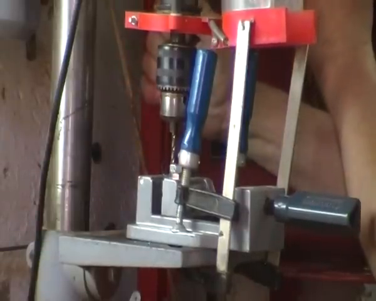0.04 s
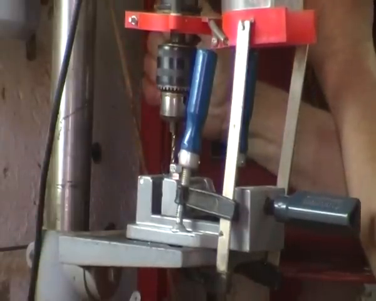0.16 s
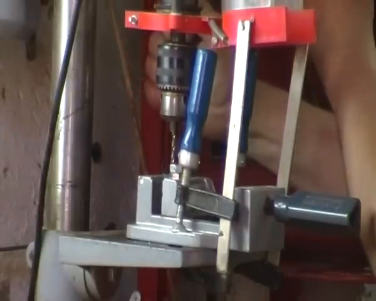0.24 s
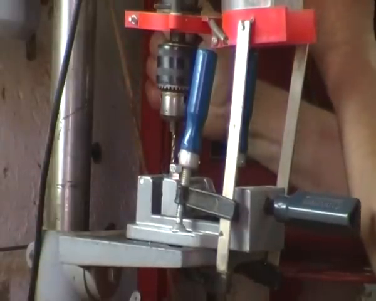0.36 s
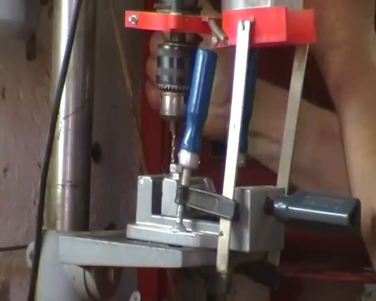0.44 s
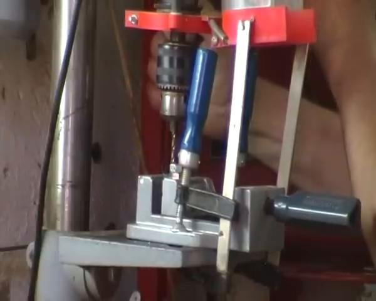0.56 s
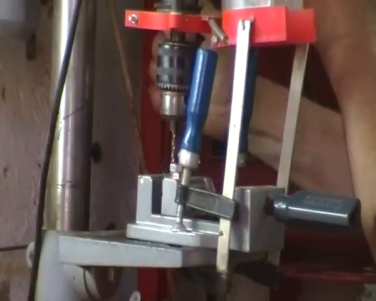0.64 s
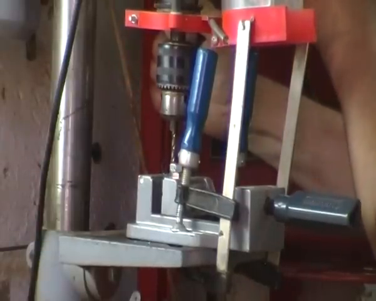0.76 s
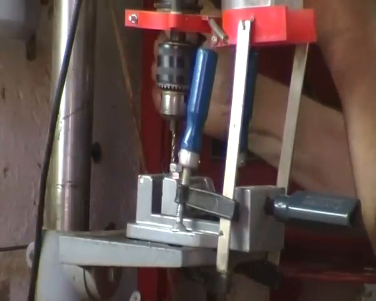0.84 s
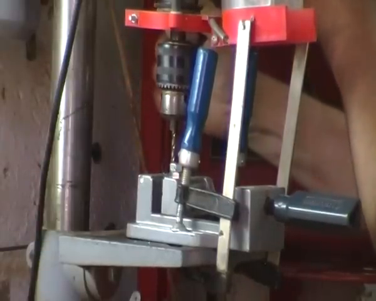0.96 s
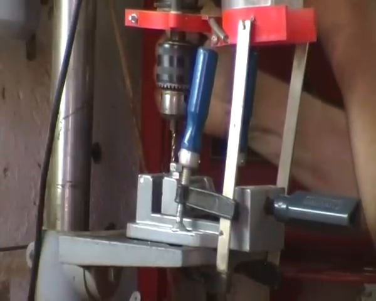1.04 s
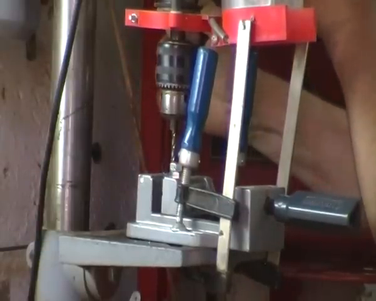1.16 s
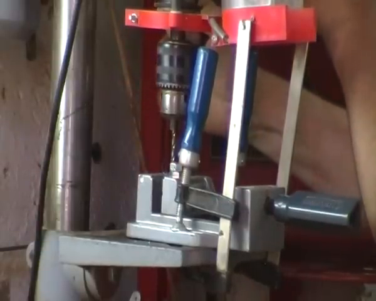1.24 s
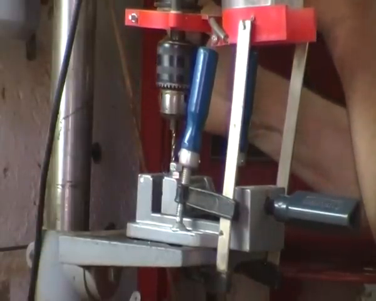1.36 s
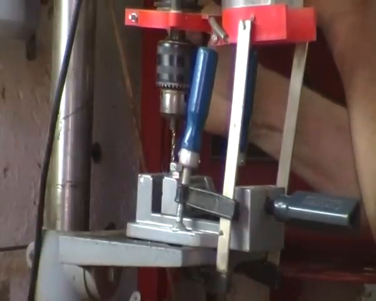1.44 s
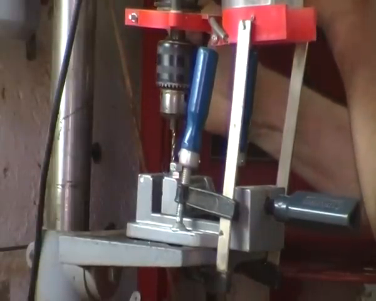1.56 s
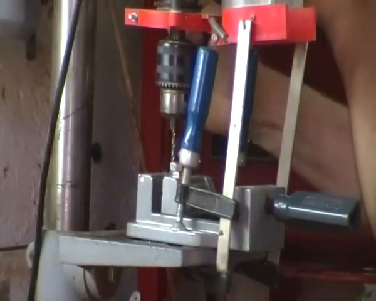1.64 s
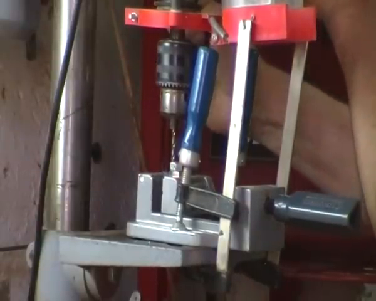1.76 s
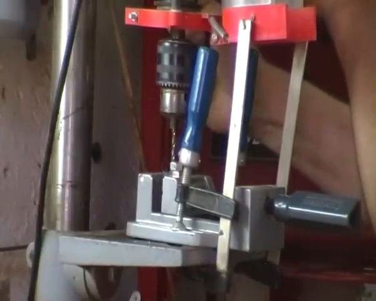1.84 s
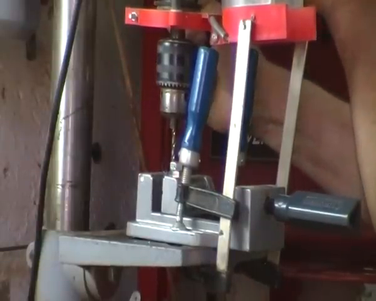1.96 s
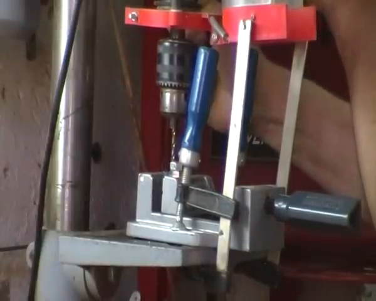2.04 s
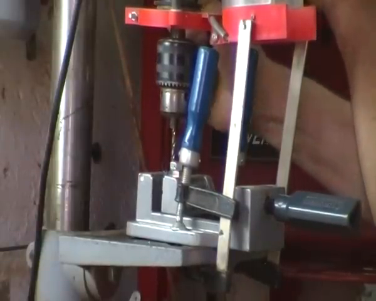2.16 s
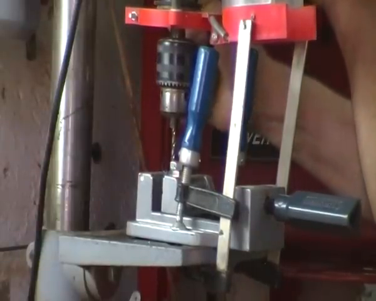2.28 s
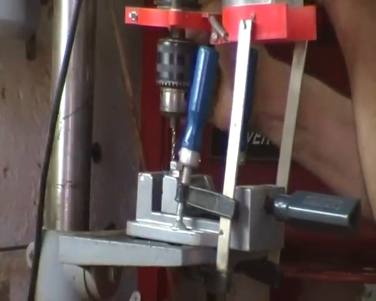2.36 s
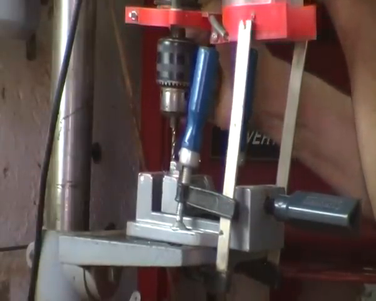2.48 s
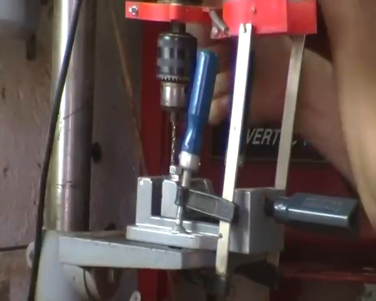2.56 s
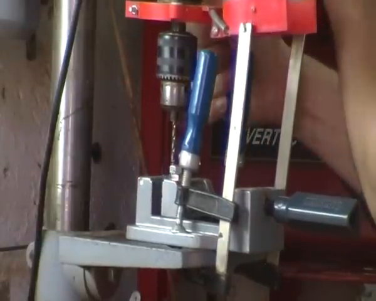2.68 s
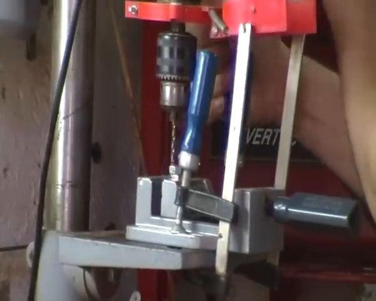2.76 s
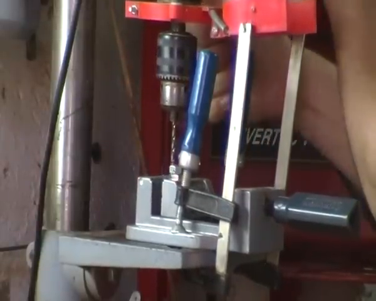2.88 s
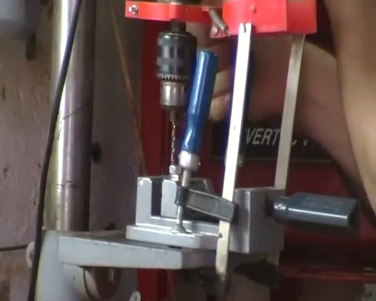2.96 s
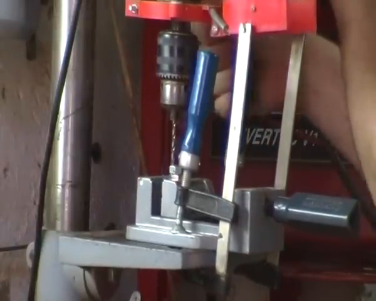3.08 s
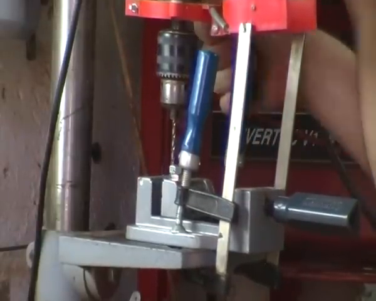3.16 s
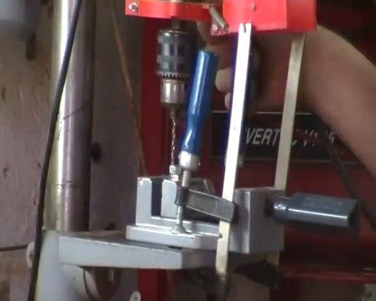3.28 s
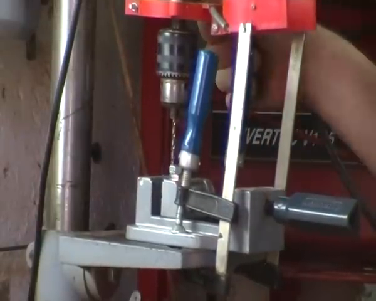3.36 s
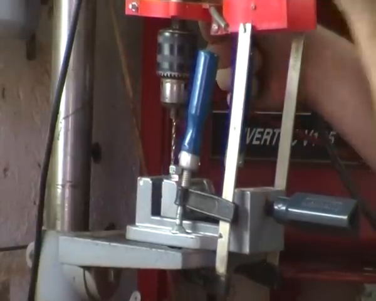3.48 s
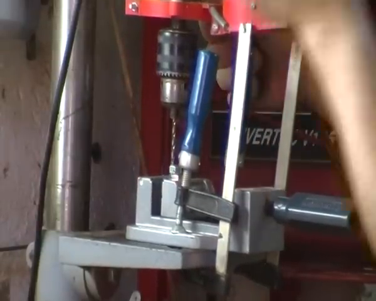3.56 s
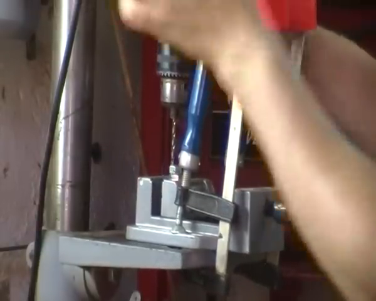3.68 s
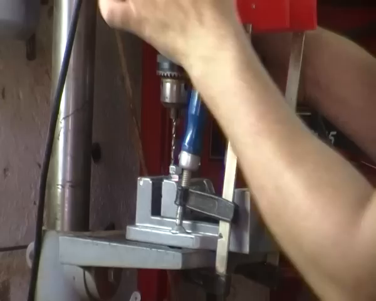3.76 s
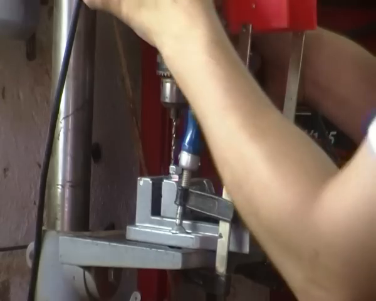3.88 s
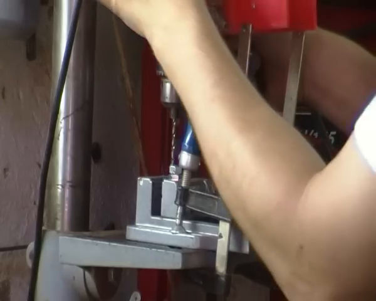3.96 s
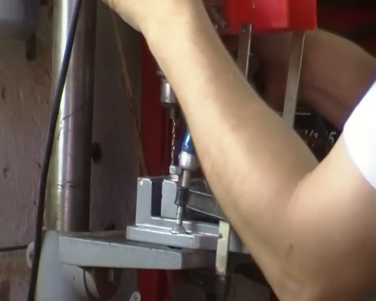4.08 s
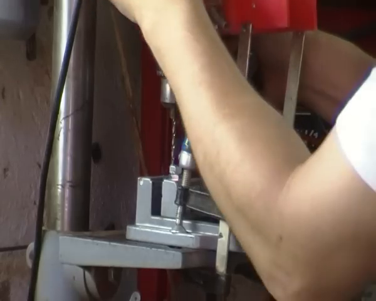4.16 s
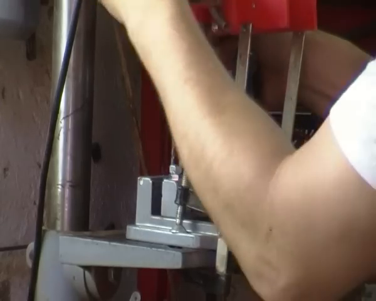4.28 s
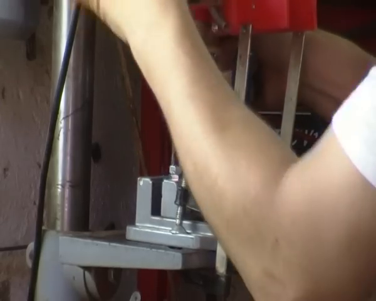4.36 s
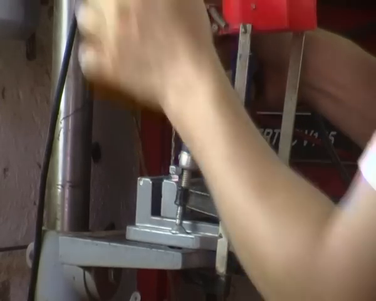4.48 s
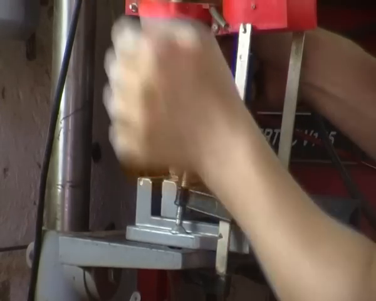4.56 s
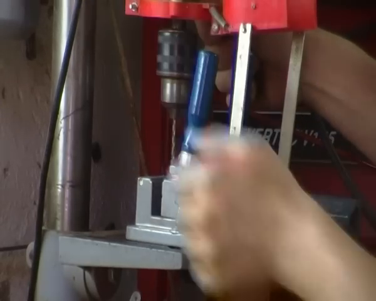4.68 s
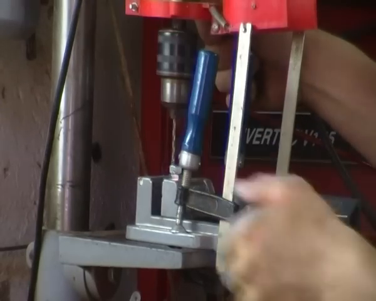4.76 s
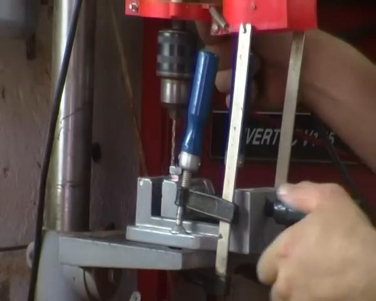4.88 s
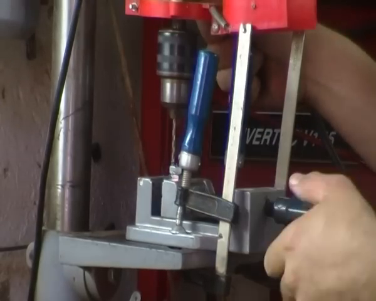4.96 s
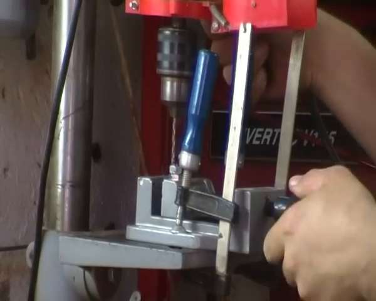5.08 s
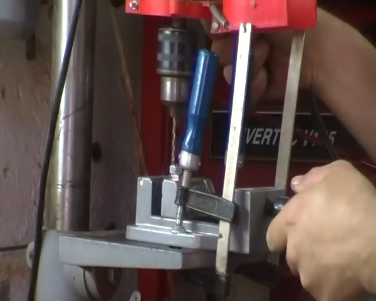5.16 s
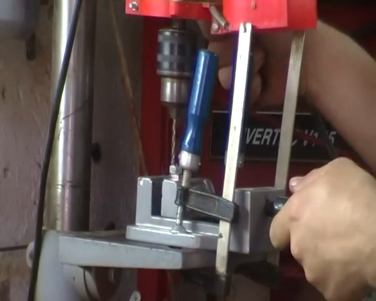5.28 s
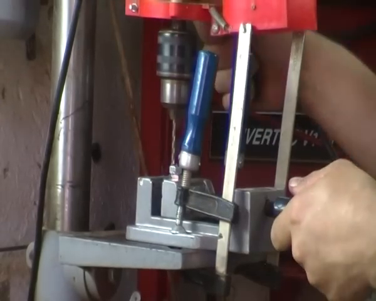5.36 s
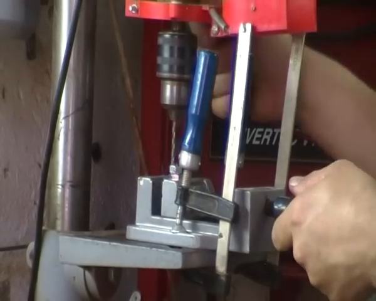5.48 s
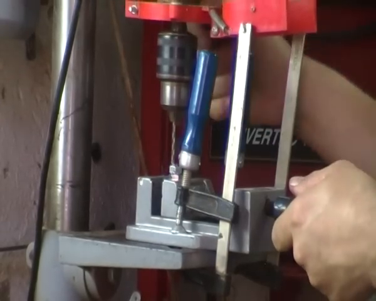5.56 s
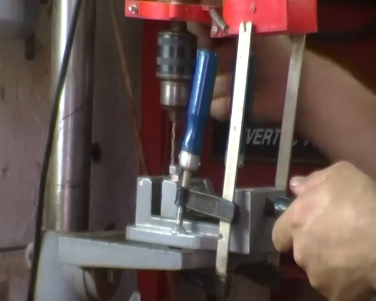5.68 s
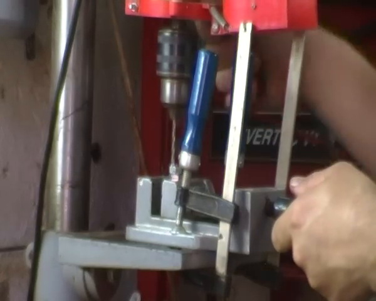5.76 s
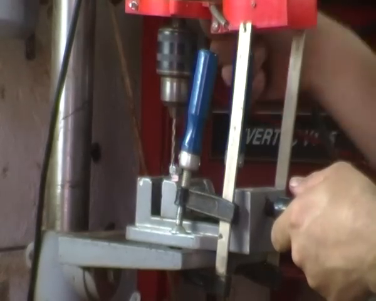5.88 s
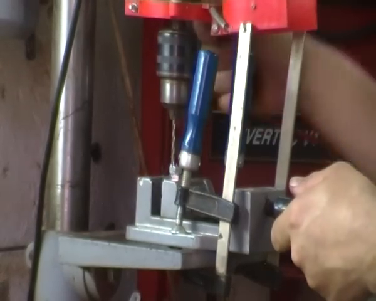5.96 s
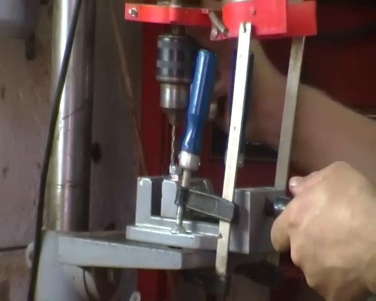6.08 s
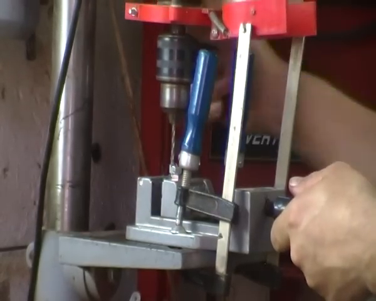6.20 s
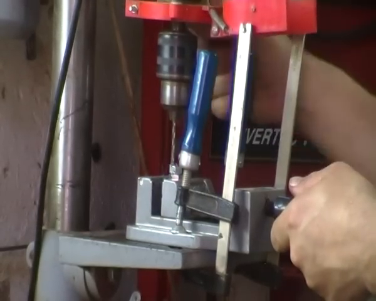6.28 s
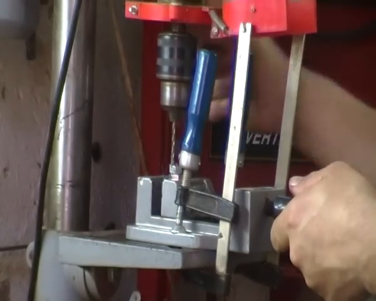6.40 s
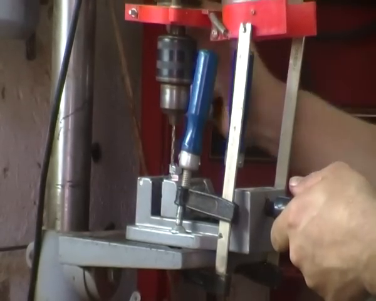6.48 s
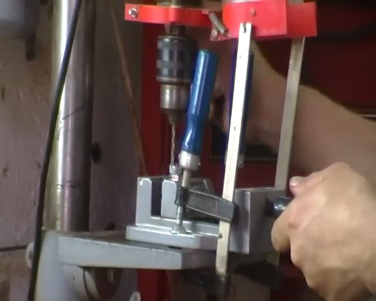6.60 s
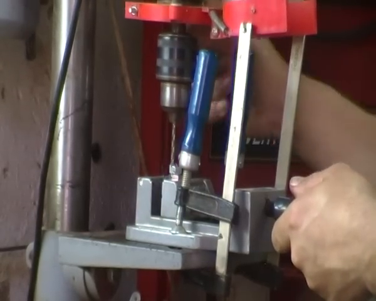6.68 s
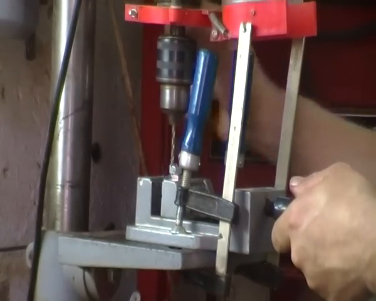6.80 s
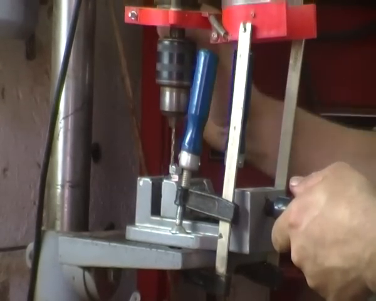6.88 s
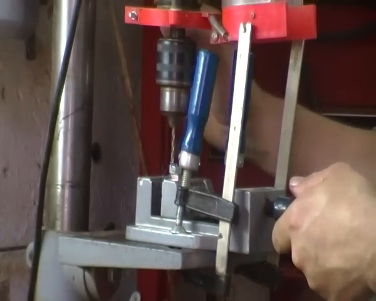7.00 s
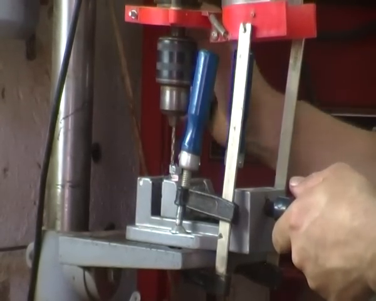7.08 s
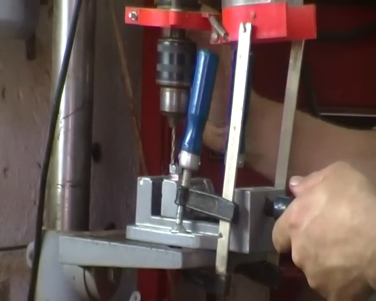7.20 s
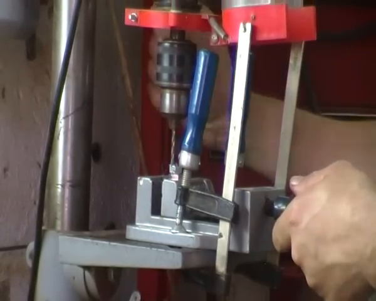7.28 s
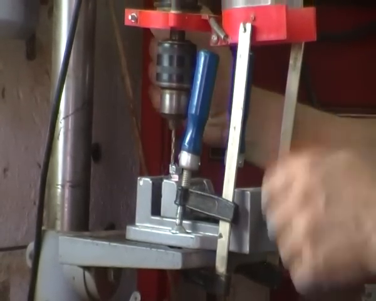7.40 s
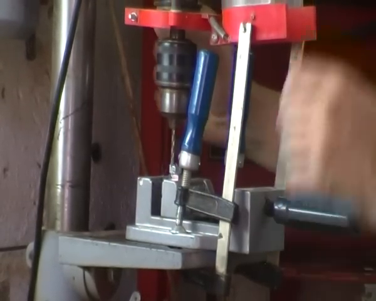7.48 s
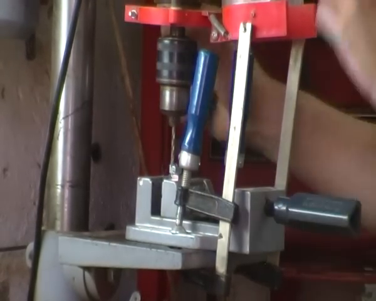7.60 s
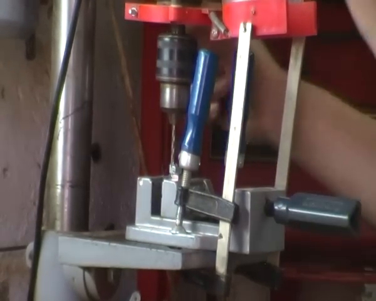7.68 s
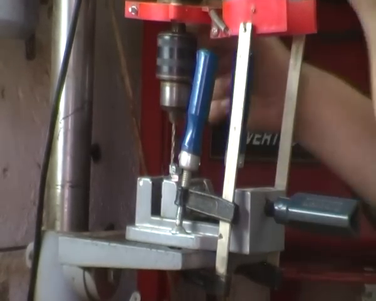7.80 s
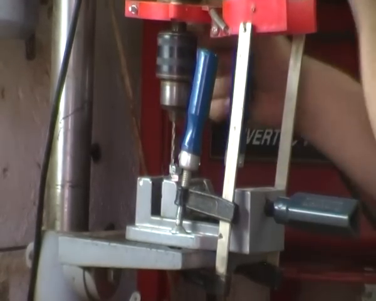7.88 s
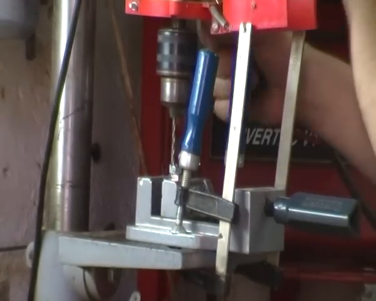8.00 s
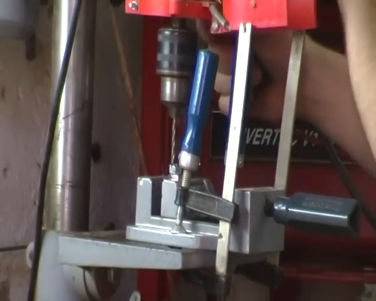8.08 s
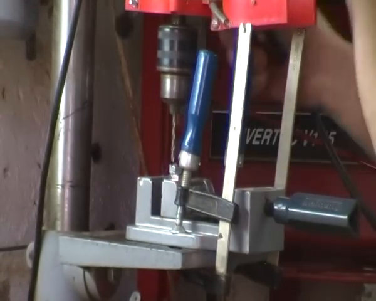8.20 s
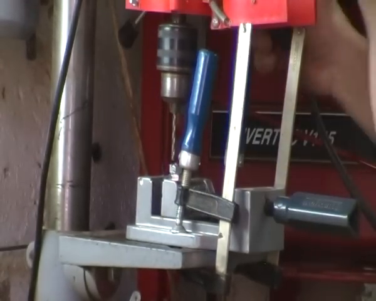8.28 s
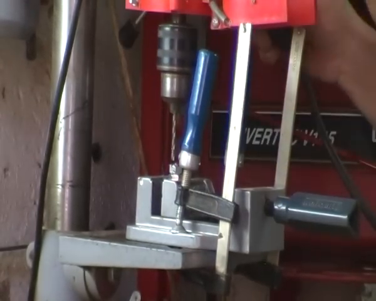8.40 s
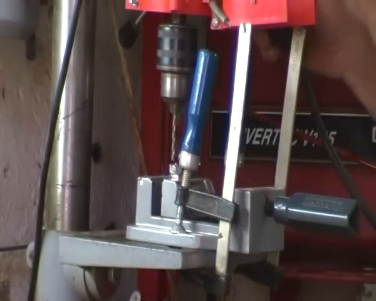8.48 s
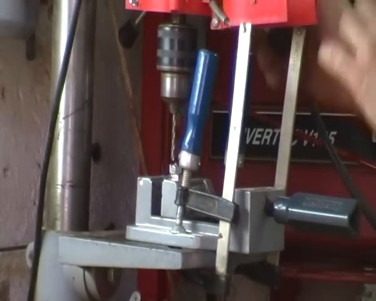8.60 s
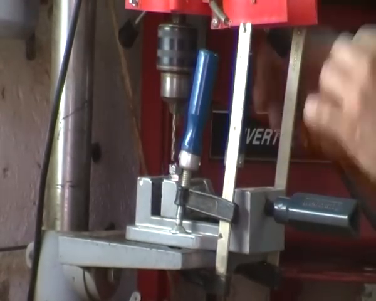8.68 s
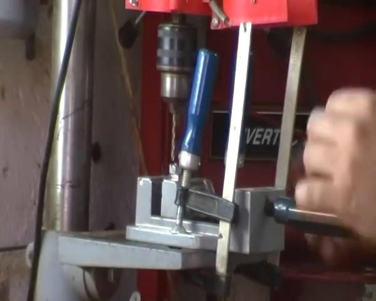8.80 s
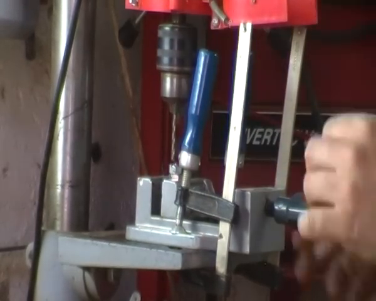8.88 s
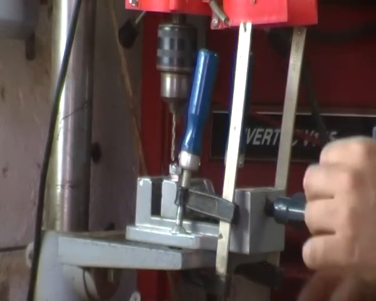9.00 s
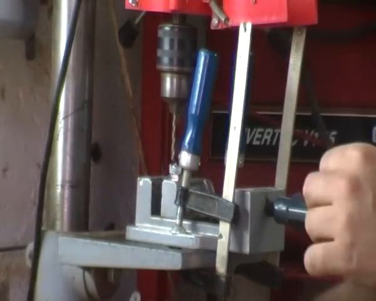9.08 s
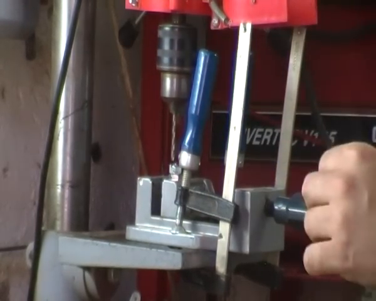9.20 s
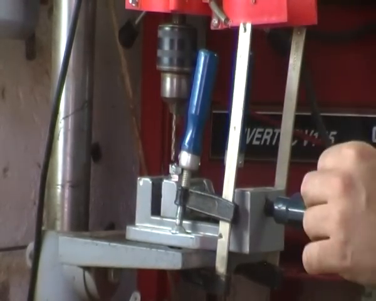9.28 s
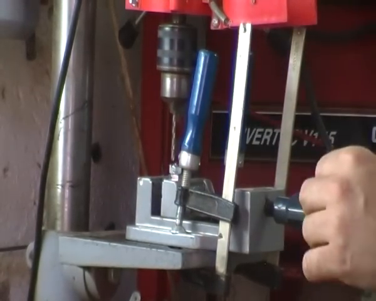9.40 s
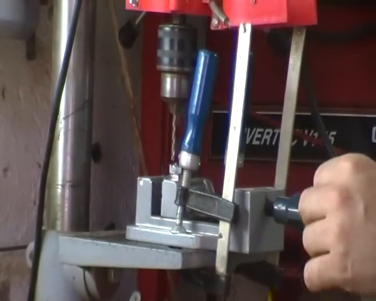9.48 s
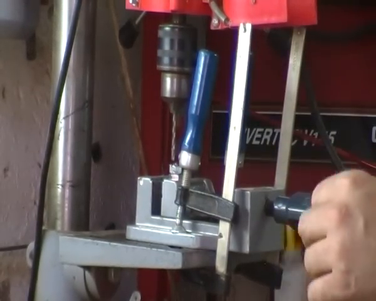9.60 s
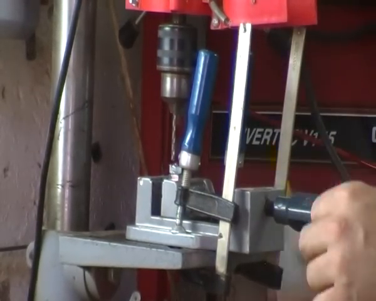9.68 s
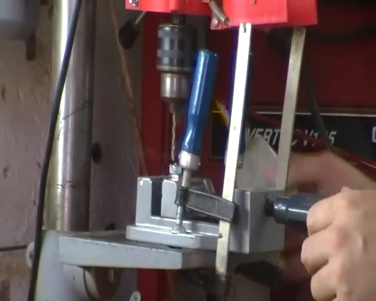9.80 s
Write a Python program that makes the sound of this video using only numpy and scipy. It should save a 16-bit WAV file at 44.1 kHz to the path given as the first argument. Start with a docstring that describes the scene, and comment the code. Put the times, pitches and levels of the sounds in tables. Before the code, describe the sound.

Over four seconds of near quiet, birds twitter outside and metal parts knock on a bench, the hardest blow cracking loudly. A thump and snap of the switch bring in a steady mid-low motor hum with rough housing noise. Jingling, ticking steel chatter rides on top, swelling and thinning irregularly. Short live workshop reverberation, close stereo microphone, machine a little to the left.

```python
"""A home workshop with hard walls: metal parts knock on a bench, a switch snaps and a belt-driven drill press runs.
The induction motor hums on multiples of its turning rate, the housing rumbles and hisses, loose steel parts chatter.
Knocks and strikes are short noise bursts that excite resonances; birds twitter outside as gliding whistles.
A small stereo microphone with a limiter listens from the right of the machine."""
import sys
import numpy as np
from scipy import signal
from scipy.fft import rfft, irfft, next_fast_len
from scipy.io import wavfile
from scipy.ndimage import uniform_filter1d

SR = 44100
rng = np.random.default_rng(int(sys.argv[2]) if len(sys.argv) > 2 else 0)


def gain_from_decibels(decibels):
    """Convert decibel values to linear amplitude factors."""
    exponent = np.asarray(decibels, float) / 20
    return 10 ** exponent


def dump(signal):
    """Clip the signal to [-1, 1] and save it as 16-bit WAV at the path in sys.argv[1]."""
    limited = np.clip(np.atleast_2d(signal).T, -1, 1)
    pcm = np.round(limited * 32767).astype(np.int16)
    wavfile.write(sys.argv[1], SR, pcm)


N = 434385
T = np.arange(N) / SR   # seconds
SWITCH_S, FULL_SPEED_S = 4.213, 4.35

# Stereo image of sources close to the microphone. Each row: frequency in Hz, left-right likeness (0 to 1).
NEAR_ALIKE = [(60, 0.61), (180, 1), (550, 0.97), (1650, 1), (4970, 0.64), (8500, 0.03), (15000, 0.031)]
# Stereo image of distant sources. Each row: frequency in Hz, left-right likeness (0 to 1).
FAR_ALIKE = [(60, 0.79), (180, 0.67), (550, 0.39), (1650, 0.39), (4970, 0.4), (15000, 0.076)]


def rms_one(x):
    """Scale to unit rms."""
    return x / np.sqrt(np.mean(x ** 2) + 1e-20)


def at_hz(points, hz):
    """Read a table on a log-frequency axis."""
    table_hz, values = np.transpose(points)
    return np.interp(np.log(hz + 1e-3), np.log(table_hz), values)


def drift(rate):
    """Random wander of spread about 1, with two new random points per cycle of the rate in Hz."""
    knots = rng.standard_normal(3000)
    return np.interp(T * rate * 2, np.arange(3000), knots) * 1.2


def noise(spectrum, alike, size=N):
    """Stereo noise of a given colour and left-right likeness; rms 1."""
    padded = next_fast_len(size)
    hz = np.arange(padded // 2 + 1) * SR / padded
    mid, side = rfft(rng.standard_normal((2, padded))) * gain_from_decibels(at_hz(spectrum, hz))
    likeness = np.clip(at_hz(alike, hz), 0, 1)
    both = np.sqrt(1 + likeness) * mid + np.sqrt(1 - likeness) * side * np.array([[1], [-1]])
    return rms_one(irfft(both, padded)[:, :size])


def band(x, low_hz, high_hz):
    """Causal band-pass."""
    edges_hz = [low_hz, min(high_hz, 0.45 * SR)]
    return signal.sosfilt(signal.butter(2, edges_hz, "band", fs=SR, output="sos"), x)


def resonate(x, hz, width_hz):
    """One damped resonance, gain about 1 on top."""
    r = np.exp(-np.pi * width_hz / SR)
    poles = [1, -2 * r * np.cos(2 * np.pi * hz / SR), r * r]
    return signal.lfilter(np.array([1, 0, -1]) * (1 - r * r) / 2, poles, x + 1e-18)


def ring_modes(blows, modes):
    """A struck body as a sum of resonances, each as narrow as its decay time demands."""
    return sum(gain_from_decibels(level_db + 4.5) * resonate(blows, hz, np.log(1000) / np.pi / t60)
               for hz, level_db, t60 in modes)


def burst(s, ms, white, colour):
    """A contact as a short scratch that swells and dies, with a smooth spectrum: (slice, samples)."""
    t = T[:len(white)]
    phases = rfft(white * t * np.exp(-1000 * t / ms))
    hz = np.arange(len(phases)) * SR / len(white)
    at = round(s * SR)
    # keep only the phases, so that the colour alone sets the spectrum
    shape = irfft(phases / np.abs(phases) * gain_from_decibels(at_hz(colour, hz)))
    return slice(at, at + len(white)), shape[:N - at]


def room(x, alike, direct_db, build_ms):
    """Direct sound plus a diffuse tail off the walls that builds up and dies band by band."""
    # Reverberation of the workshop. Each row: frequency in Hz, time to fall 60 dB in seconds.
    decay_times = [(80, 0.93), (250, 0.52), (1000, 0.45), (4000, 0.4), (11000, 0.26)]
    size = SR
    t = T[:size]
    white = rfft(noise([(20, 0), (20000, 0)], alike, size=size))
    octave = np.log2(np.arange(size // 2 + 1) + 1.0)   # bins are 1 Hz apart
    tail = 0
    for centre in np.arange(5, 14.6, 0.5):
        share = np.maximum(1 - 2 * np.abs(octave - centre), 0)   # overlapping half-octave bands that sum to one
        tail = tail + irfft(white * share, size) * gain_from_decibels(-60 * t / at_hz(decay_times, 2 ** centre))
    tail = tail * (1 - np.exp(-1000 * t / build_ms))
    tail = tail / np.sqrt(np.mean(np.sum(tail ** 2, axis=1)))
    tail[:, 0] = gain_from_decibels(direct_db)
    return signal.fftconvolve(x[None], tail, axes=1)[:, :N]


def air():
    """Distant background as steady coloured noise, wide in stereo."""
    # Colour of the background. Each row: frequency in Hz, relative level in dB per Hz.
    air_colour = [(21, -31), (35, -1.5), (87, -14.5), (301, -22), (342, -24), (1280, -27.5), (2010, -30.5),
                  (3340, -26), (5010, -30), (7150, -32), (7910, -30), (8530, -32), (14900, -31.5)]
    return gain_from_decibels(-47.5) * noise(air_colour, FAR_ALIKE)


def drone():
    """Two narrow low bands, the lower one stronger once the drill runs, and slow pressure swings."""
    # Slow pressure swings at the microphone. Each row: start in seconds, relative level in dB, length in seconds.
    puffs = [(4.144, -27.5, 0.075), (6.177, -32, 0.13), (6.6, -39, 0.2), (7.155, -31, 0.093),
             (7.45, -32, 0.32), (8.183, -35, 0.13), (8.748, -30, 0.2), (9.43, -30, 0.091),
             (9.778, -26, 0.1)]
    # Stereo image of the drone. Each row: frequency in Hz, left-right likeness (0 to 1).
    drone_alike = [(20, 0.99), (90, 0.8)]
    low_db = -48.5 + 7.5 * np.clip((T - FULL_SPEED_S) / 0.16, 0, 1)
    low = noise([(18, -26), (24, 29), (28, 36), (32, 6), (38, -37)], drone_alike)
    mains = noise([(38, -40), (47, -23), (50, 22.5), (54, -12), (70, -27), (90, -40.5)], drone_alike)
    swings = gain_from_decibels(-55) * noise([(2, -20), (5, 0), (14, 0), (22, -25), (40, -60)], FAR_ALIKE)
    for s, level_db, length in puffs:
        phase = np.clip((T - s) / length, 0, 1)
        swings = swings + gain_from_decibels(level_db + 4.0) * np.sin(np.pi * phase) * np.sin(2 * np.pi * phase)
    return gain_from_decibels(low_db) * low + gain_from_decibels(-53) * mains + swings


def whine():
    """Electrical tones of steady pitch whose levels waver."""
    # Each row: frequency in Hz, relative level in dB.
    whine_tones = [(113, -60), (7800, -65), (7827, -81)]
    return sum(gain_from_decibels(level_db + 2.0 + 1.9 * drift(16.0)) * np.sin(2 * np.pi * hz * T)
               for hz, level_db in whine_tones)


def birds():
    """Quick falling whistles with a rough flutter in pitch; fainter ones call at random further off."""
    # Bird notes. Each row: start in seconds, length in seconds, starting pitch in Hz, relative level in dB.
    bird_notes = [(0.0, 0.019, 3400, -45.5), (0.111, 0.077, 3500, -54), (0.123, 0.026, 5170, -54),
                  (0.21, 0.028, 5100, -48), (0.23, 0.065, 4710, -49), (0.207, 0.073, 4000, -53),
                  (0.419, 0.061, 3660, -53), (0.616, 0.036, 3620, -52), (0.651, 0.058, 3110, -50),
                  (0.763, 0.082, 3500, -53), (1.037, 0.028, 3550, -58), (1.088, 0.077, 4620, -50),
                  (1.136, .05, 5100, -56), (1.17, 0.043, 3480, -51), (1.33, 0.044, 4280, -54),
                  (1.36, 0.067, 3260, -49), (1.75, 0.095, 3550, -56), (1.96, 0.058, 3950, -54),
                  (2.08, 0.084, 3480, -53), (2.17, 0.038, 4980, -51), (2.18, 0.12, 4620, -52.5),
                  (2.423, 0.072, 3630, -49.5), (2.927, 0.064, 4650, -49.5), (3.202, 0.076, 3640, -58),
                  (3.332, 0.049, 3800, -53), (3.377, 0.031, 2650, -59), (3.634, 0.087, 3350, -58),
                  (3.765, 0.054, 3800, -51), (3.822, 0.038, 2620, -60), (3.93, .04, 4700, -60),
                  (3.976, .04, 3980, -53), (4, 0.071, 3500, -53)]
    chance = rng.random((85, 3))
    distant = [(4.3 * when, 0.07, 3000 + 1900 * pitch ** 2, -64 + 1.2 * loud) for when, pitch, loud in chance]
    flutter = 1 + 0.034 * drift(160)
    out = np.zeros(N)
    for s, length, first_hz, level_db in bird_notes + distant:
        t = T[:round(length * SR)]
        at = max(round(s * SR), 0)
        fall = 0.0286 if first_hz > 4000 else 0.15   # share of the pitch lost; high notes nearly hold theirs
        hz = first_hz * (1 - fall * t / length) * flutter[at:at + len(t)]
        swell = np.sqrt(np.sin(np.pi * t / length))
        out[at:at + len(t)] += gain_from_decibels(level_db + 4.0) * swell * np.sin(2 * np.pi * np.cumsum(hz) / SR)
    return out


def knocks():
    """Each blow has its own colour and rings bench and vise; deep bass and top treble radiate little."""
    # Blows. Each row: start in seconds, relative level in dB, strongest pitch in Hz,
    # fall above it in dB per octave, time constant of the contact in ms.
    blow_list = [(0.322, -26.5, 1490, 7.5, 5.7), (0.323, -14, 180, 13.5, 5.1), (0.326, -18.5, 550, 11, 4.5),
                 (1.483, -6, 233, 19, 9), (1.484, -27, 880, 7.5, 5.7), (1.489, -39.5, 5960, -2.5, 9.4),
                 (2.557, -38.5, 900, 6.5, 9.9), (2.587, -29, 2500, 5, 0.96), (2.5911, 3, 756, 1.4, 0.95),
                 (2.6, 0.5, 290, 10, 15), (3.037, -36.5, 600, 7.5, 3.3), (3.24, -39, 250, 8, 2.9),
                 (3.977, -41.5, 400, 6, 6.5), (4.197, -19.5, 110, 11, 6.5), (4.2119, -24.5, 248, 5.5, 4.5),
                 (4.2129, -29, 7340, 9.5, 3.2)]
    # Rings of bench and vise. Each row: frequency in Hz, relative level in dB, time to fall 60 dB in seconds.
    bench_modes = [(69, 9, 0.97), (177.4, -1.5, 0.15), (234.4, 6, 0.28), (290, 0, 0.18), (350, -2.5, 0.11),
                   (469, -7, 0.23), (550, -20, 0.16), (900, -1, 0.021), (4560, -12, 0.004)]
    # Short rings heard straight from the vise, without the room; columns as for the bench.
    vise_modes = [(1090, -4, .03), (2250, -5.5, 0.034), (3500, -6, .02), (5250, 1, .025)]
    # How well the bench radiates. Each row: frequency in Hz, gain in dB.
    radiation = [(60, -43), (130, 3.5), (250, -2.7), (480, 4.2), (700, -3.5), (1300, 0), (2500, 2.5),
                 (8000, 1), (13000, -10)]
    blows = np.zeros(N)
    white = rng.standard_normal((len(blow_list), 4096))
    hz = np.geomspace(60, 13000, 48)
    for (s, level_db, top_hz, fall_db, ms), w in zip(blow_list, white):
        octaves = np.log2(hz / top_hz)
        rise_db = max(7.5, fall_db)   # dB per octave below the strongest pitch
        colour_db = level_db + np.minimum(rise_db * octaves, -fall_db * octaves) + at_hz(radiation, hz)
        where, shape = burst(s, ms, w, np.transpose([hz, colour_db]))
        fade = np.minimum((len(w) - np.arange(len(w))) / len(w) * 2, 1)   # the second half fades out
        blows[where] += gain_from_decibels(34.5) * shape * fade
    bench = ring_modes(blows, bench_modes)
    vise = ring_modes(blows, vise_modes)
    return room(blows + bench, NEAR_ALIKE, direct_db=-4.0, build_ms=1.5) + vise


def scrapes():
    """Brief rubs of metal on metal: noise that swells and dies through one broad resonance, used twice."""
    # Each row: start in seconds, relative level in dB, pitch in Hz, time constant in ms.
    rubs = [(7.37, -20.5, 3570, 7.4), (7.412, -22, 2230, 9), (7.422, -20, 2940, 5.8), (6.9, -23, 750, 15),
            (6.19, -22, 2750, 7), (9.5, -23, 3600, 7.2)]
    out = np.zeros(N)
    white = rng.standard_normal((len(rubs), 4096))
    for (s, level_db, hz, ms), w in zip(rubs, white):
        x = 1000 * T[:len(w)] / ms
        at = round(s * SR)
        rub = resonate(resonate(w * x * np.exp(-x), hz, 900), hz, 900)
        out[at:at + len(w)] += gain_from_decibels(level_db + 24.5) * rub
    return gain_from_decibels(-12.5) * room(out, NEAR_ALIKE, direct_db=6.0, build_ms=3.7)


def chatter(loose_db):
    """Strikes that each catch the steel resonances differently, and a dense random patter over a broad scratch."""
    # Strikes of loose parts. Each row: start in seconds, relative level in dB, relative level of the low thud in dB,
    # relative level of the treble in dB, centre of the main ring in Hz.
    strikes = [(4.3522, -22.5, -16, -15, 4790), (4.413, -28, 6, -12, 4830), (4.46, -31, -14, -4, 5100),
               (4.5082, -20.5, 1, -17, 4600), (4.582, -21, -16, -15, 5210),
               (4.6278, -18.5, -2.5, -14, 5100), (4.7416, -20.5, -0.5, -6, 5300), (4.76, -28, -18, 2, 5200),
               (4.8266, -36, -11, -14, 5110), (4.8579, -17.5, -5, -6.5, 5170),
               (4.9412, -23.5, 2.5, -8, 5070), (4.961, -30, -9, 1, 5150), (5.017, -23, 0, -11, 5400),
               (5.119, -29, -18, -11, 5570), (5.1637, -22.5, -19, -14.5, 5250),
               (5.296, -25.5, -4, -12, 5300), (5.315, -25.5, 2, -12, 5020), (5.39, -31, -14, -21, 5260),
               (5.447, -20.5, 1, -10.5, 5250), (5.588, -20, -2.5, -11, 5540), (5.62, -21.5, 0.5, -12, 5230),
               (5.6642, -17.5, -8, -9.5, 5320), (5.7148, -15.5, -5, -9.5, 5260),
               (5.765, -14, -16, -12.5, 5250), (5.822, -26.5, -11, -3.5, 5020),
               (5.8731, -15.5, -10, -11, 5250), (6.0419, -19.5, 1.5, -6.5, 5300),
               (6.1157, -19.5, -4, -11, 5250), (6.163, -22.5, -4, -5.5, 5370),
               (6.1917, -16.5, -5.5, -10, 4960), (6.261, -26, 4.5, -6, 5160),
               (6.311, -15.5, -10, -14.5, 5000), (6.365, -30, -20, -1, 5530), (6.419, -35, -11, -14, 5240),
               (6.466, -22.5, -25, -7, 5230), (6.5126, -19, -6, -9.5, 5300), (6.561, -18, -7, -7, 5200),
               (6.698, -25, -5, -10, 5100), (6.732, -14.5, -24, -16, 5240), (6.816, -17.5, -23, -8, 5200),
               (6.8988, -18.5, 0, -8.5, 5950), (7.009, -17, -0.5, -10, 5250),
               (7.135, -20.5, -2.5, -15, 5500), (7.231, -21, -7, -10.5, 4940), (7.291, -28, -12, -6, 5020),
               (7.321, -19.5, -2, -9, 5540), (7.372, -22.5, -14, -5, 5350), (7.4256, -23.5, 1, -6, 5500),
               (7.514, -22.5, -4, -17, 5720), (7.568, -30, 7, -21, 4600), (7.614, -25.5, -12, -9, 5540),
               (7.6935, -17.5, -4, -20, 5250), (7.789, -21, -10, -18, 4870), (7.8653, -21, -6, -8, 5350),
               (7.9156, -16.5, -4, -11.5, 5170), (7.966, -23, -22, -4, 5260), (8.0182, -19, -23, -17, 5020),
               (8.1479, -22.5, -1.5, -12, 5020), (8.241, -24.5, -0.5, -11, 5500),
               (8.309, -20, -7.5, -16, 5010), (8.447, -26.5, 2.5, -15, 5530), (8.6, -24.5, -4, -17, 4840),
               (8.899, -27, 1, -23, 5120), (9.526, -24.5, 2.5, -12, 5000)]
    # Resonances of loose steel parts. Each row: frequency in Hz, width in Hz, relative level in dB.
    steel_parts = [(2520, 16, -2.5), (3550, 250, -10), (4620, 97, -2), (4830, 100, -3), (5020, 120, 2),
                   (5250, 140, 3), (5400, 75, -3), (5540, 210, -2), (5940, 160, -3.5), (6460, 390, -11.5),
                   (7670, 240, -11), (8190, 360, -4.5), (9040, 280, -11), (9330, 240, -5.5),
                   (10030, 230, -13.5), (10990, 220, -7)]
    count = len(steel_parts)
    white = rng.standard_normal((len(strikes), 2048))
    catch_db = 3.5 * rng.standard_normal((len(strikes), count))
    scratch, struck = np.zeros(N), np.zeros((count, N))
    parts_hz = np.array(steel_parts)[:, 0]
    main = (parts_hz > 4000) & (parts_hz < 6200)
    for (s, level_db, low_db, high_db, ring_hz), w, catch in zip(strikes, white, catch_db):
        thud = [(100, low_db - 38), (300, low_db + 8.5), (1000, low_db + 1.5), (2500, low_db - 0.5)]
        treble = np.array([(3800, -10.5), (5300, -11.0), (7000, -11.0),
                           (8300, high_db), (11000, high_db - 4.5), (13000, high_db - 5.5)])
        where, shape = burst(s, 6.8, w, thud + list(treble))
        # parts far from the centre of the main ring sound less: 23 dB per kHz, at most 12 dB
        off_db = main * np.minimum(23 * np.abs(parts_hz - ring_hz) / 1000, 12)
        struck[:, where] += gain_from_decibels(level_db + 34.0 + catch - off_db)[:, None] * shape
        dull = thud + list(treble + [0, -10])   # little of a strike's treble escapes the resonances
        scratch[where] += gain_from_decibels(level_db + 30.0) * burst(s, 4.8, w, dull)[1]

    sizes = gain_from_decibels(4.0 * np.minimum(rng.exponential(1, N), 3)) * rng.choice([-1, 1], N)
    grains_per_s = 1500 * gain_from_decibels(3.0 * drift(15))
    patter = gain_from_decibels(loose_db + 0.5) * rms_one(sizes * (rng.random(N) < grains_per_s / SR))
    in_play = np.array([gain_from_decibels(4.0 * drift(16)) for _ in steel_parts])   # each part joins in and drops out
    hit = rng.integers(0, count, N) == np.arange(count)[:, None]      # a grain rings one part
    struck += gain_from_decibels(-0.3) * in_play * patter * hit
    rings = sum(gain_from_decibels(level_db + 6.5) * resonate(x, hz, width_hz)
                for x, (hz, width_hz, level_db) in zip(struck, steel_parts))
    out = scratch + gain_from_decibels(-15.5) * band(patter, 2400, 19000) + rings
    out = signal.sosfilt(signal.butter(4, 12800, fs=SR, output="sos"), out)
    return gain_from_decibels(-0.5) * room((T > SWITCH_S) * out, NEAR_ALIKE, direct_db=-0.9, build_ms=2.9)


def vibration_db():
    """How hard the machine vibrates: it rises after the switch, then its level changes now and then."""
    # The machine shudders. Each row: peak in seconds, change in dB, time to rise and again to fall in seconds.
    shudders = [(5.15, 1, 0.35), (5.744, 3.5, 0.1), (6.075, 8.5, 0.043), (6.945, 2, 0.35), (7.416, 8, 0.13),
                (7.945, 3, 0.17), (8.798, -0.5, 0.27), (9.467, 1, 0.23), (9.85, 2, 0.091)]
    rise_db = -10 * np.exp(-np.maximum(T - SWITCH_S, 0) / 0.068)   # 10 dB down at first, closing in with 68 ms
    return rise_db + sum(change_db * np.maximum(1 - np.abs(T - s) / length, 0) for s, change_db, length in shudders)


def housing(loose_db):
    """The running machine's body: low rumble and hiss as shaken noise; the hiss follows the loose parts."""
    # Colour of the rumble. Each row: frequency in Hz, relative level in dB per Hz.
    rumble_colour = [(59, -66), (86, -43), (100, -16), (242, -7), (273, -13.5), (312, -8.5), (344, -10.5),
                     (364, -8.5), (398, -10.5), (447, 0), (460, -5), (484, -4), (501, -18), (536, -3.5),
                     (683, -16.5), (910, -9.5), (1040, -21.5), (1400, -15), (1820, -46), (3080, -120)]
    # Colour of the hiss before its treble is scaled. Each row: frequency in Hz, relative level in dB per Hz.
    hiss_colour = [(590, -4.5), (1000, 1.5), (1240, -11), (1460, 3), (1710, -3), (1940, -0.5), (2130, -2),
                   (2450, -0.5), (2720, -3.5), (2950, -2), (3400, -5.5), (4130, -6.5), (4400, -9),
                   (5110, -8.5), (7130, -15), (9520, -18), (13000, -60)]
    shake_db = 0.5 * drift(14) + 1.3 * drift(45)   # the belt and housing shake unevenly
    rumble = gain_from_decibels(-28 + shake_db) * noise(rumble_colour, NEAR_ALIKE)
    hiss = noise(hiss_colour, NEAR_ALIKE)
    top = band(hiss, 3200, 23000)
    hiss = hiss + top * (gain_from_decibels(9.5 + 0.3 * loose_db) - 1)   # the treble follows the looseness more closely
    hiss = gain_from_decibels(-25.5 + 0.18 * loose_db + 1.1 * shake_db) * hiss
    return (T > SWITCH_S) * gain_from_decibels(vibration_db()) * (rumble + hiss)


def motor_hum():
    """Multiples of the shaft rate, each wavering in level; they fade in once the motor reaches speed."""
    # Lines of the hum. Each row: multiple of the shaft rate, relative level in dB.
    hum_lines = [(4, -14.5), (5, -8.5), (6.58, -8.5), (8, -6), (9, -13.5), (10, -4.5), (12, -8), (13, -1.5),
                 (15, 1.5), (16, -9.5), (17, -6), (18, -14), (19, 3.5), (21, -4), (22, -5.5), (23, -13),
                 (24, -6), (25, -12.5), (28, -10), (30, -8.5), (32, -13), (33, -15.5), (35, -16),
                 (36, -4.5), (37, -8.5), (40, -10.5), (44, -11), (58, -20), (60, -17), (64, -14),
                 (78, -12.5), (82, -18), (98, -14)]
    shaft_hz = 24.85 * (1 + 0.00075 * drift(1.465))
    turns = np.cumsum(shaft_hz) / SR
    lines = np.zeros(N)
    for multiple, level_db in hum_lines:
        cycles = multiple * turns + 0.04 * drift(4) + rng.random()
        lines += gain_from_decibels(level_db + 3 * drift(6)) * np.sin(2 * np.pi * cycles)
    return gain_from_decibels(-26) * rms_one(lines) * np.clip((T - FULL_SPEED_S) / 0.017, 0, 1)


def scene():
    """Machine and bench close by and to the left, birds and air far off."""
    # How freely the loose parts chatter. Each row: time in seconds, looseness in dB.
    looseness = [(4.22, -60), (4.33, -44), (4.42, -27.5), (4.78, -30), (5.04, -32), (5.19, -52),
                 (5.41, -35), (5.49, -33), (5.74, -32), (5.92, -30), (5.98, -45), (6.03, -28), (6.06, -27),
                 (6.95, -26), (7.41, -32.5), (7.96, -27), (8.06, -32), (8.72, -41.5), (9.52, -34),
                 (9.66, -39.5), (9.85, -34)]
    loose_db = np.interp(T, *np.transpose(looseness))
    far = air() + drone() + whine()
    far = far + room(birds(), FAR_ALIKE, direct_db=-9, build_ms=5.0)
    near = knocks() + scrapes() + chatter(loose_db) + housing(loose_db) + motor_hum()
    sides = np.array([[0.5], [-0.5]])   # left, right
    return near * gain_from_decibels(4.5 * sides) + far * gain_from_decibels(2 * sides)   # left over right, in dB


def drop_faint_treble(x):
    """A treble band passes only while its level per Hz is within a margin of the level of the whole sound."""
    # Edges of the treble bands in Hz.
    edges_hz = [9600, 10100, 10600, 11200, 11800, 12200, 12700, 13400, 14200, 16500]
    size = next_fast_len(N)
    spectrum = rfft(x, size)
    hz = np.arange(size // 2 + 1) * SR / size
    whole = irfft(spectrum * (hz > 100), size)[:, :N]
    whole_power = uniform_filter1d(np.mean(whole ** 2, axis=0), size=2048)
    out = irfft(spectrum * (hz < edges_hz[0]), size)[:, :N]
    for low, high in zip(edges_hz, edges_hz[1:]):
        part = irfft(spectrum * (hz >= low) * (hz < high), size)[:, :N]
        per_hz = uniform_filter1d(np.mean(part ** 2, axis=0), size=1024) / (high - low)
        margin_db = 67.5 if low < 11800 else 57   # the highest bands need more level to pass
        margin_db = margin_db + 3.5 * drift(11)   # the margins flicker
        above_db = 10 * np.log10(np.abs(per_hz / whole_power) + 1e-20) + margin_db
        out += part * uniform_filter1d(np.clip(above_db / 2 + 0.5, 0, 1), size=512)
    return out


def band_limit(x):
    """A steep low-pass at the top of the band."""
    return signal.sosfilt(signal.butter(12, 15910, fs=SR, output="sos"), x)


def record(dry):
    """A limiter ducks within milliseconds and recovers fast; what escapes it clips; the top is cut."""
    knee_db, release_db_per_s, attack_ms = -0.5, 146, 0.5
    firmness = 0.75   # share of the excess that is taken away
    level_db = 20 * np.log10(np.abs(dry).max(axis=0) + 1e-9)
    held_db = np.maximum.accumulate(level_db + release_db_per_s * T) - release_db_per_s * T
    r = np.exp(-1000 / (attack_ms * SR))
    duck_db = signal.lfilter([1 - r], [1, -r], firmness * np.maximum(held_db - knee_db, 0))
    clipped = np.clip(dry * gain_from_decibels(-duck_db), -1, 1)
    top_cut = signal.cheby2(12, 60, 15700, fs=SR, output="sos")   # 60 dB down from 15.7 kHz
    limited = signal.sosfilt(top_cut, clipped)
    return band_limit(drop_faint_treble(limited))


dry = scene()
out = record(dry)
dump(out)
```